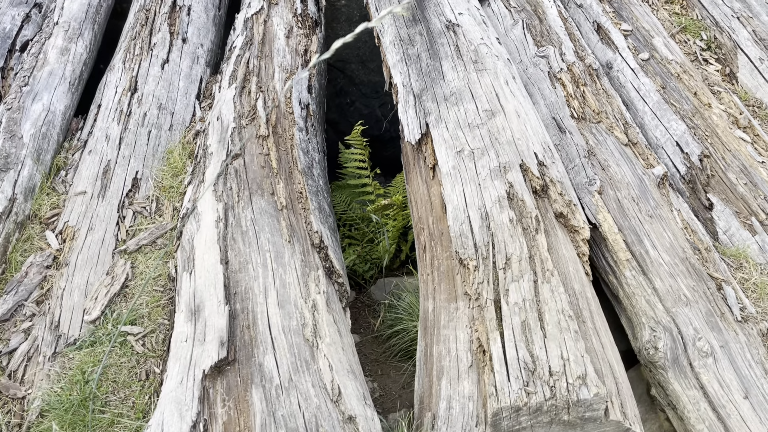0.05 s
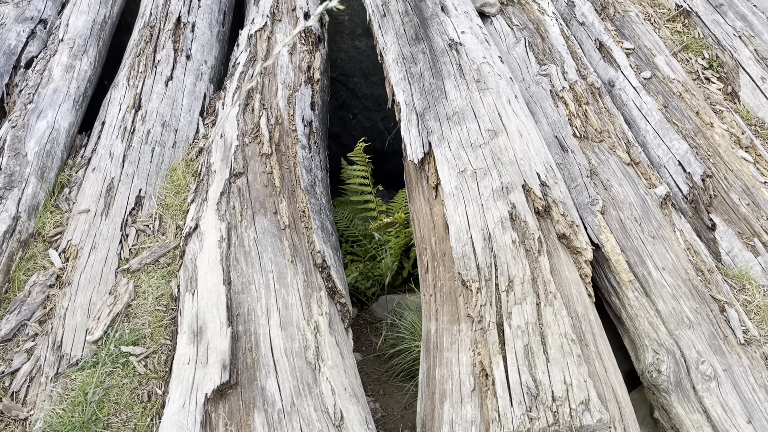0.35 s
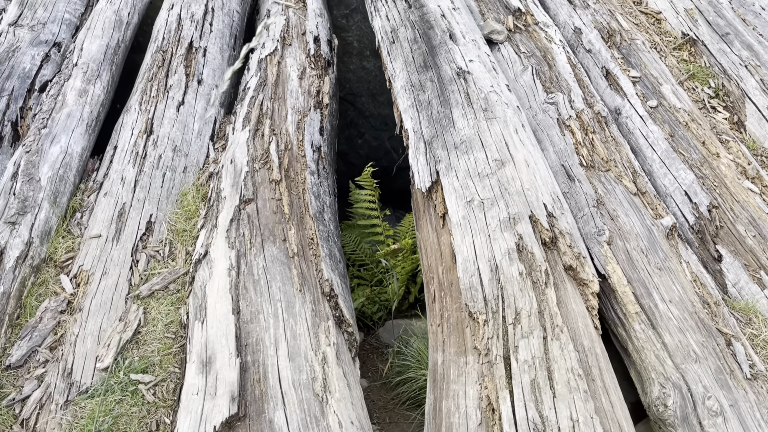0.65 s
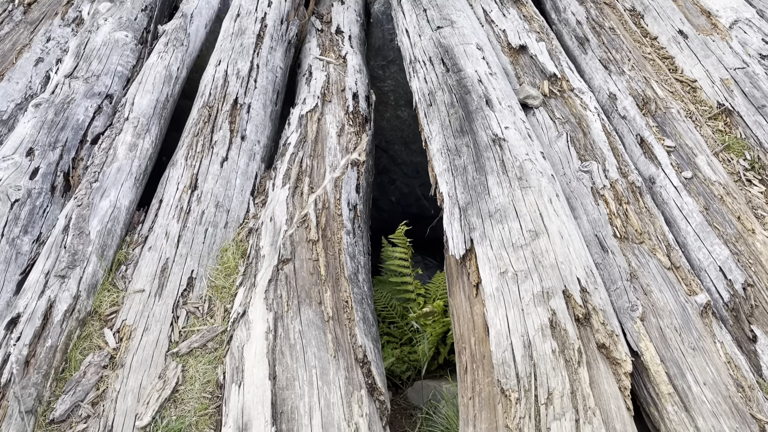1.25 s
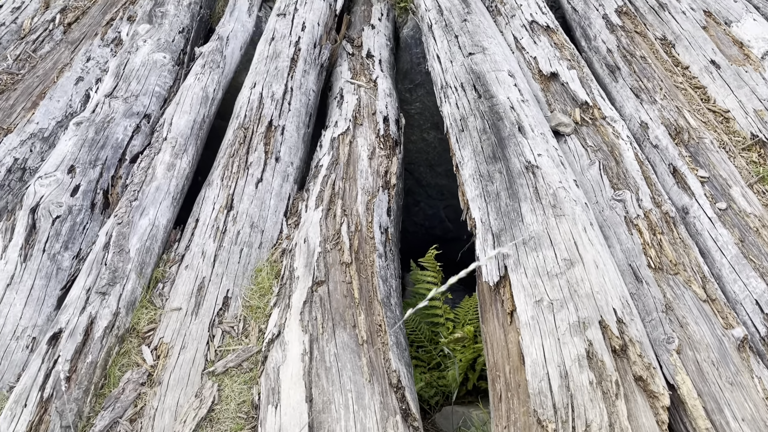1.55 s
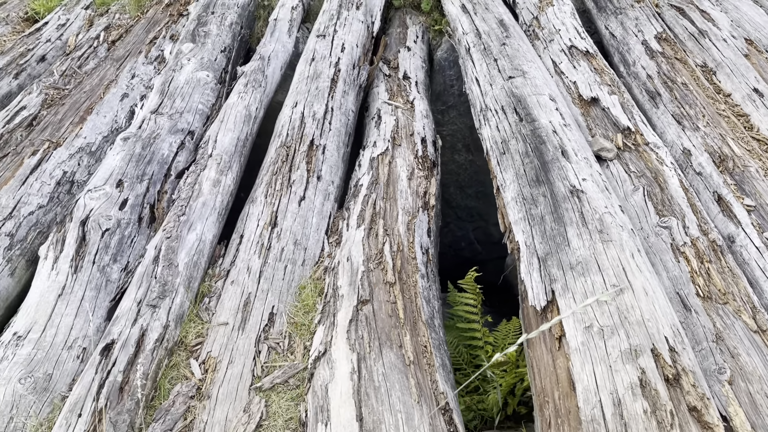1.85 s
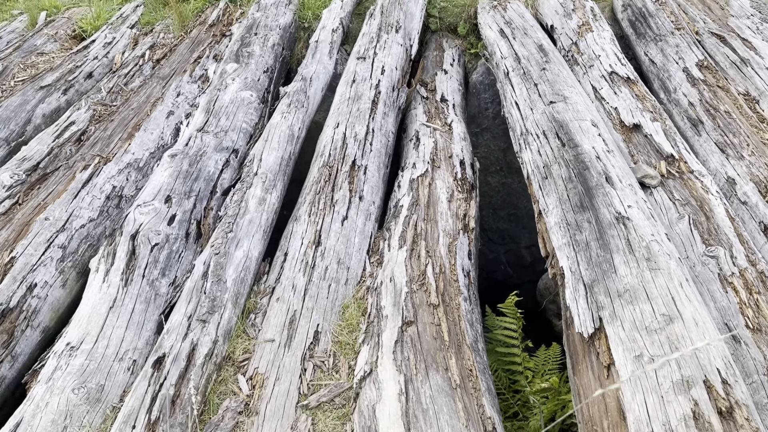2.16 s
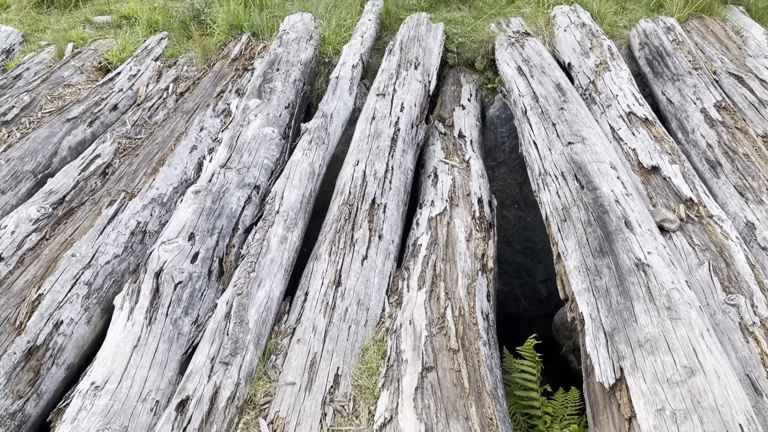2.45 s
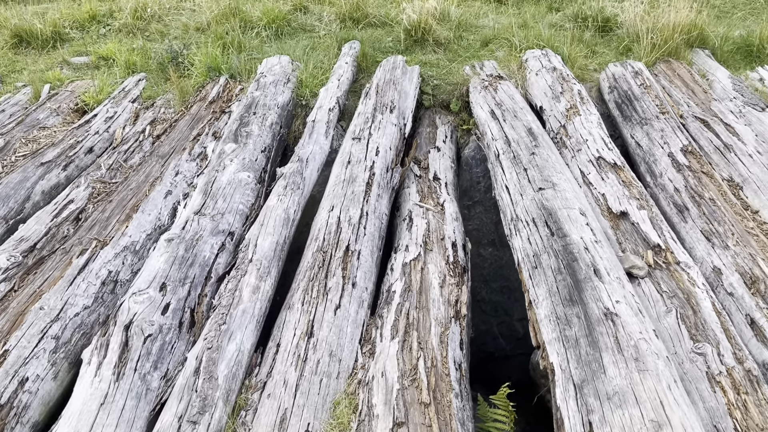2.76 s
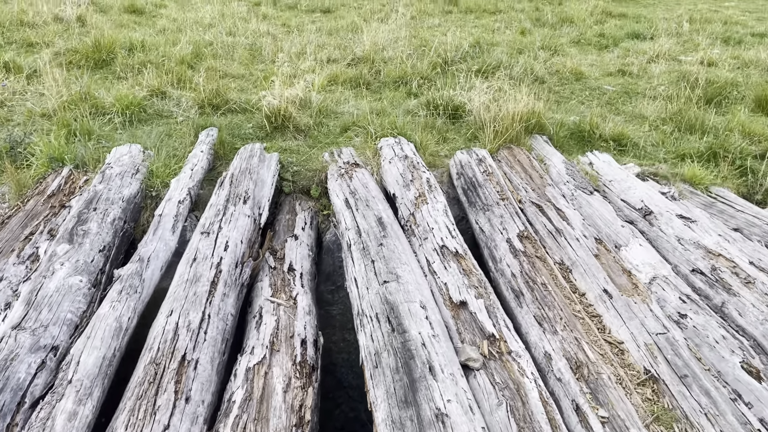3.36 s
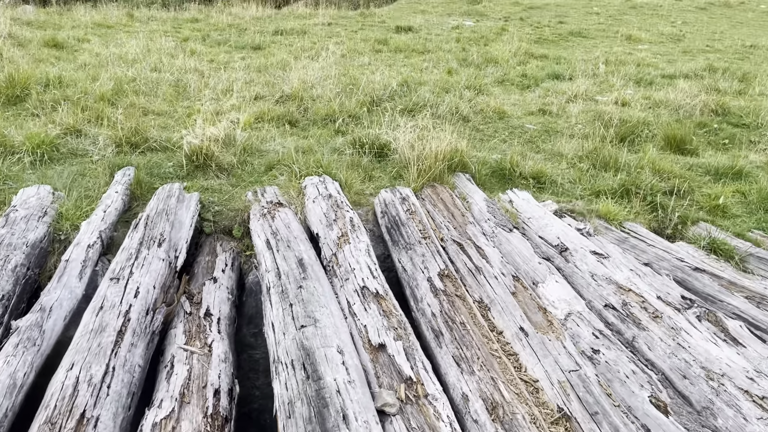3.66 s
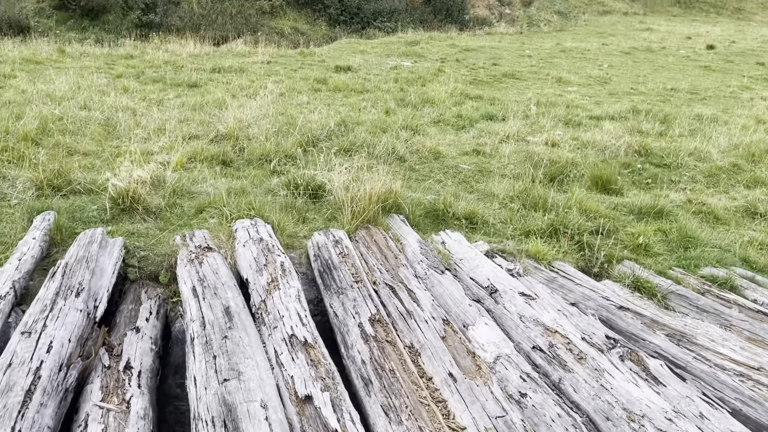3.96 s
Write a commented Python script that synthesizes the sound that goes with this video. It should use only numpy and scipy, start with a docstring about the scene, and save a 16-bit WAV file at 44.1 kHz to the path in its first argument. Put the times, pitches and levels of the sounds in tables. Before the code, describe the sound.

Three short, high animal whistles over wind buffeting the microphone and a steady hiss.

```python
"""A mountain meadow, where an unseen animal, perhaps a marmot, gives three short arched whistles.
Each is a harmonic tone with breath noise, shaped by fixed throat resonances and scattered by the slopes.
Puffs of wind buffet the microphone with rumble, flapping and dull knocks.
A steady distant rush, a fine hiss and a few faint rustles lie underneath."""
import sys
import numpy as np
from scipy import signal
from scipy.fft import rfft, irfft, next_fast_len
from scipy.io import wavfile
from scipy.ndimage import map_coordinates

SR = 44100
rng = np.random.default_rng(int(sys.argv[2]) if len(sys.argv) > 2 else 0)


def output_pcm(signal):
    """Save a mono or channel-first signal as 16-bit PCM at the path in sys.argv[1].

    Samples are clipped to [-1, 1] before scaling.
    """
    pcm = np.clip(np.atleast_2d(signal).T, -1, 1) * 32767
    wavfile.write(sys.argv[1], SR, np.round(pcm).astype(np.int16))


N = 176400
T = np.arange(N) / SR

# Phase lead of the left microphone port over the right: frequency_hz, lead_rad
PORT_LEAD = [(300, 0.02), (600, -0.64), (1500, -1.47), (2700, 1), (5100, 0.94), (5800, -2.5), (6800, -0.1),
             (8000, -3.5), (10000, -4), (13200, -6)]


def amp(db):
    """Amplitude ratio: a factor of ten for every 20 dB."""
    return 10 ** (np.asarray(db) / 20)


def unit(x):
    """Normalisation to an rms of 1."""
    return x / np.sqrt(np.mean(x ** 2) + 1e-20)


def along(points, hz):
    """Interpolation of (frequency_hz, value) points on a logarithmic frequency axis."""
    f, v = np.transpose(points)
    return np.interp(np.log(hz + 1), np.log(f + 1), v)


def wobble(rate):
    """Random modulation: a smooth curve through `rate` Gaussian values a second."""
    return map_coordinates(rng.standard_normal(int(N * rate / SR) + 4), [T * rate])


def filtered(x, response):
    """Linear filtering: the spectrum is multiplied by a complex frequency response."""
    size = next_fast_len(N + SR // 2)
    return irfft(rfft(x, size) * response(np.fft.rfftfreq(size, 1 / SR)), size)[..., :N]


def at_ports(x, share=1):
    """Phase difference: a share of the port lead, split evenly between left and right."""
    return filtered(x, lambda hz: np.exp(.5j * share * np.outer([1, -1], along(PORT_LEAD, hz))))


def noise(spectrum):
    """Partial coherence: independent mid and side noises mix into a stereo pair of rms 1."""
    # Likeness of the two ports: frequency_hz, coherence
    coherence = [(60, 0.91), (330, 0.8), (550, 0.48), (1400, 0.53), (2600, 0.63), (4600, 0.84),
                 (7000, 0.21), (8200, 1), (12500, 1), (14000, 1)]

    def mid_side_gains(hz):
        angle = np.arccos(np.clip(along(coherence, hz), -1, 1)) / 2
        return amp(along(spectrum, hz)) * [np.cos(angle), np.sin(angle)]

    mid, side = filtered(rng.standard_normal((2, N)), mid_side_gains)
    return unit(at_ports(np.array([mid + side, mid - side])))


def meadow():
    """Broadband background noise: a far rush of air or water and a fine hiss, both nearly steady."""
    # Spectra of the rush and the hiss: frequency_hz, level_db
    rush_spectrum = [(20, -51), (60, -8.5), (150, -3), (350, -0.5), (520, -7), (800, -7), (1400, -15.5),
                     (2000, -21), (3000, -25.5), (5000, -31), (8000, -49), (16000, -72)]
    hiss_spectrum = [(1000, -32), (4000, -8), (6500, 0), (8200, -4.5), (9500, .5), (12300, -1.5),
                     (13800, -8), (15600, -17)]
    rush = amp(-38 + .26 * wobble(3.43) + .67 * wobble(14)) * noise(rush_spectrum)
    hiss = amp(-56.5 + .18 * wobble(6.14)) * noise(hiss_spectrum)
    return rush + hiss


def rustles():
    """Amplitude-modulated noise: brief, grainy brushing, as of grass or clothing."""
    # Brushing contacts: centre_s, half_width_s, level_db
    brushes = [(.09, .061, -59.5), (1.295, .04, -55.5), (1.385, .013, -53), (1.658, .033, -56.5),
               (3.85, .13, -61)]
    # Spectrum of the brushing: frequency_hz, level_db
    spectrum = [(800, -20), (2500, -6), (5000, -3), (8000, 0), (12500, 0), (15500, -12)]
    envelope = sum(amp(db) * np.exp(-((T - s) / width_s) ** 2) for s, width_s, db in brushes)
    return envelope * unit(amp(3 * wobble(300)) * noise(spectrum))


def wind():
    """Turbulent pressure on the microphone: puffs rumble and flap above a light breeze."""
    # Puffs of wind: start_s, length_s, rumble_db, flap_db
    puffs = [(1.214, .036, -23.5, -39.5), (1.255, .03, -30, -36), (1.296, 0.032, -30, -33.5),
             (1.375, 0.077, -33, -33.5), (1.472, 0.12, -34, -41), (1.626, .125, -25, -35),
             (1.786, .034, -23.5, -35), (1.918, .068, -32, -39), (2.033, 0.078, -32.5, -44.5),
             (2.227, .041, -28, -40), (2.319, .035, -29, -43), (2.365, .04, -35, -47),
             (2.473, 0.026, -36, -47), (2.606, .1, -33.5, -54), (2.928, 0.214, -32.5, -53),
             (3.27, .05, -34, -53), (3.419, .12, -31, -44), (3.59, 0.13, -38.5, -54),
             (3.802, 0.021, -30.5, -45), (3.928, .08, -28, -38.5)]
    # Spectra of the low rumble and the higher flapping: frequency_hz, level_db
    rumble_spectrum = [(15, -60), (25, -32), (40, -6), (65, 1), (120, -3), (200, -11), (400, -31),
                       (1000, -55), (3000, -100)]
    flap_spectrum = [(40, -37), (130, -1.5), (260, 1), (420, -7.5), (620, -20), (1400, -34.5),
                     (4000, -41.5), (9000, -72)]
    attack_s, release_s, breeze_db = .0059, .014, -42.5
    rumble_gain, flap_gain = amp(breeze_db + 1.5 * wobble(7.04)), np.zeros(N)
    for start_s, length_s, rumble_db, flap_db in puffs:
        attack = np.clip((T - start_s) / attack_s + .5, 0, 1)
        envelope = attack * np.exp(-np.maximum(T - start_s - length_s, 0) / release_s)
        rumble_gain = np.maximum(rumble_gain, amp(rumble_db) * envelope)
        flap_gain = np.maximum(flap_gain, amp(flap_db) * envelope)
    rumble = rumble_gain * amp(.93 * wobble(35)) * noise(rumble_spectrum)
    flap = flap_gain * amp(3.5 * wobble(60)) * noise(flap_spectrum)
    return rumble + flap


def knocks():
    """Pressure pulses: each slap of wind is a Gaussian burst of a few low cycles, alike at both ports."""
    # Slaps on the microphone: centre_s, pitch_hz, envelope_peak_db
    slaps = [(1.22, 170, -24), (1.235, 80, -20), (1.258, 330, -23.5), (1.387, 220, -27), (1.643, 270, -25),
             (1.698, 290, -23), (1.75, 240, -20.5), (1.793, 125, -18.5), (1.824, 280, -24.5),
             (1.967, 330, -28), (2.253, 130, -22), (2.325, 250, -24.5), (2.361, 450, -26)]
    half_width_cycles = 1.5
    out = np.zeros(N)
    for centre_s, pitch_hz, peak_db in slaps:
        cycles = (T - centre_s) * pitch_hz
        out += amp(peak_db) * np.exp(-(cycles / half_width_cycles) ** 2) * np.sin(2 * np.pi * cycles)
    return out


def scatter(x, t60_s, delay_s, coherence):
    """Diffuse reflection from the slopes: convolution with decaying noise, partly shared by the ports."""
    t = T[:SR // 2]
    shared, *own = rng.standard_normal((3, len(t)))
    reflections = np.sqrt(coherence) * shared + np.sqrt(1 - coherence) * np.array(own)
    tail = reflections * amp(-60 * t / t60_s) * (t > delay_s)
    return signal.fftconvolve(x[None], tail / np.linalg.norm(tail[0]), axes=1)[:, :N]


def harmonics(top_hz, sag, before_top, age_s, call_db, bite_db):
    """Harmonic source: random modulation spreads each partial into a band, hoarser as the pitch sags."""
    # Partials ahead of the throat filter: harmonic_number, level_db
    partials = [(1, -1.5), (2, -18.5), (3, -36), (4, -33.5), (5, -39)]
    jitter, rasp_db, hoarse_db_per_sag = .0057, -15.5, 21
    thin_db, bloom_s, falter_db, loud_call_db = -8, .013, 2.5, -15.5
    pitch_hz = top_hz * (1 - sag) * (1 + jitter * wobble(500))
    phase = 2 * np.pi * np.cumsum(pitch_hz) / SR
    roughness = amp(rasp_db + hoarse_db_per_sag * sag)
    voice = np.zeros(N)
    for k, level_db in partials:
        if k > 1:
            brightness_db = .55 * (call_db - loud_call_db) * (k > 2)  # softer calls are duller
            level_db = level_db + bite_db * before_top + falter_db * wobble(130) + brightness_db
        else:  # the fundamental swells late
            level_db = level_db + thin_db * np.exp(-(age_s / bloom_s) ** 2)
        band = (1 + roughness * (wobble(700) + 1j * wobble(700))) / np.sqrt(1 + 2 * roughness ** 2)
        voice += amp(level_db) * np.real(band * np.exp(1j * k * phase))
    return np.sqrt(2) * voice


def whistle(top_s, top_hz, rise_s, fall_s, level_db, fade_db, husk_db, bite_db):
    """Source and filter: an arch of pitch through a fixed throat, with husk, a scratch and a squeak."""
    # Throat resonances: frequency_hz, gain_db
    throat = [(1200, -16), (1650, -11), (1950, -8), (2320, 3), (2600, .5), (2900, -.5), (3150, -8),
              (3750, 2), (4750, 3.5), (5350, 2), (5950, -4), (6900, 2), (7700, -1), (9700, -27), (11400, 8),
              (15000, -2)]
    # Spectra of the throat's hoarse band and of the scratchy onset: frequency_hz, level_db
    husk_spectrum = [(900, -28), (1700, -16), (2300, 2), (2700, -5), (3050, -27), (3700, -16.5),
                     (5200, -19), (6000, -40)]
    scratch_spectrum = [(700, -23), (1250, -5), (1800, 0), (2400, -0.5), (3000, -13), (4000, -4.5),
                        (5500, -26), (6500, -40)]
    edge_s, flutter_db = .02, 3
    scratch_db, scratch_at_s, scratch_width_s = -13, .005, .007
    squeak_db, squeak_hz, glide_hz_per_s, squeak_width_s = -37, 2230, 44000, .0085

    age_s = T - top_s + rise_s
    before_top, after_top = np.clip((top_s - T) / rise_s, 0, 1), np.clip((T - top_s) / fall_s, 0, 1)
    rise_sag, fall_sag = .41 * before_top ** 1.8, .37 * after_top ** 1.4  # shares of the top pitch lost
    opening, closing = np.clip(np.array([age_s, top_s + fall_s - T]) / edge_s + .5, 0, 1) ** 2
    effort = opening * closing * amp(-15 * rise_sag - 27 * fall_sag)  # level drops with pitch
    voice = harmonics(top_hz, rise_sag + fall_sag, before_top, age_s, level_db, bite_db)
    tone = filtered(voice * effort, lambda hz: amp(along(throat, hz)))

    widths_from_top = np.maximum((top_s - T) / (.8 * rise_s), (T - top_s) / (1.05 * fall_s))
    husk = amp(husk_db) * opening * np.exp(-widths_from_top ** 2) * noise(husk_spectrum)[0]
    scratch_envelope = np.exp(-((age_s - scratch_at_s) / scratch_width_s) ** 2)
    scratch = amp(scratch_db) * scratch_envelope * noise(scratch_spectrum)[0]
    squeak_phase = 2 * np.pi * age_s * (squeak_hz + glide_hz_per_s * age_s / 2)
    squeak = amp(squeak_db) * np.exp(-(age_s / squeak_width_s) ** 2) * np.sin(squeak_phase)
    gain = amp(level_db - fade_db * (after_top - before_top) / 2 + flutter_db * wobble(220))
    return (tone + husk + scratch) * gain + squeak


def animal():
    """Multipath propagation: each whistle arrives directly, off the near slopes and faintly from afar."""
    # Calls (husk is relative to the call; bite lifts the overtones at its start):
    # top_s, top_hz, rise_s, fall_s, level_db, fade_db, husk_db, bite_db, left_over_right_db
    calls = [(2.806, 2890, .044, .083, -20.7, 3.5, -17, 2, 3.5),
             (3.236, 2690, .044, .043, -28.3, 11.5, -9.5, 7, 2.5),
             (3.655, 2735, .039, .045, -30.7, 12, -13.5, 5, 6)]
    out = np.zeros((2, N))
    for *call, pan_db in calls:
        source = whistle(*call)
        near = amp(-1) * scatter(source, t60_s=.13, delay_s=.002, coherence=.35)
        far = amp(-25) * scatter(source, t60_s=1, delay_s=.018, coherence=.33)
        direct = at_ports(source, share=.7)
        out += amp(-3.5) * (direct + near + far) * amp([[pan_db / 2], [-pan_db / 2]])
    return out


def scene():
    """Superposition: the whistles add to the wind and the background."""
    return animal() + wind() + knocks() + meadow() + rustles()


def record(dry):
    """Band limiting: an ideal low-pass filter removes the highest treble."""
    cutoff_hz = 15700
    return filtered(dry, lambda hz: hz < cutoff_hz)


dry = scene()
out = record(dry)
output_pcm(out)
```